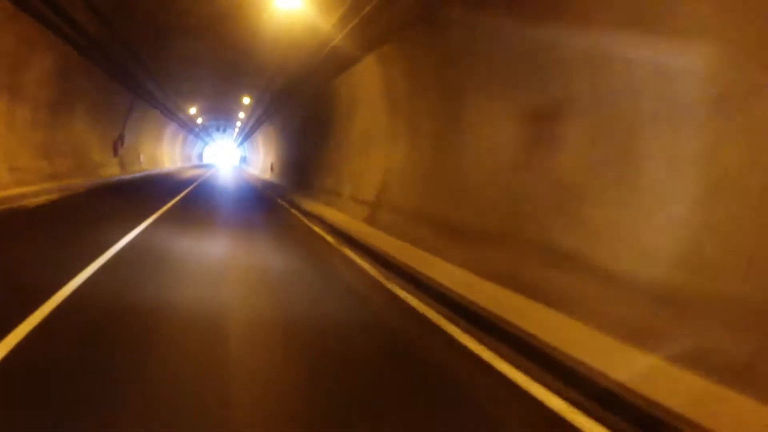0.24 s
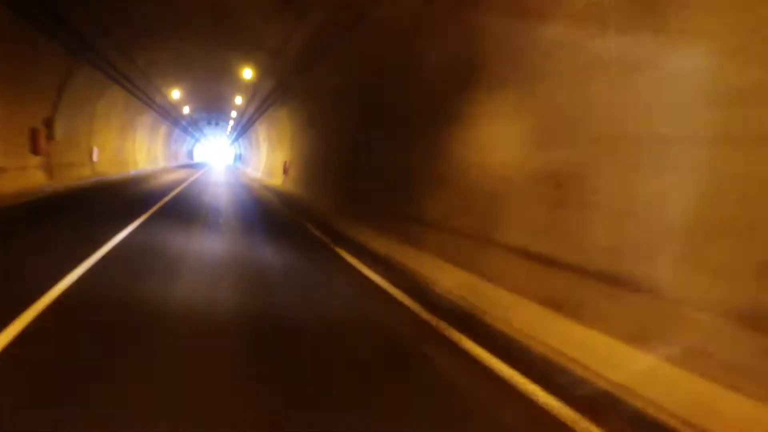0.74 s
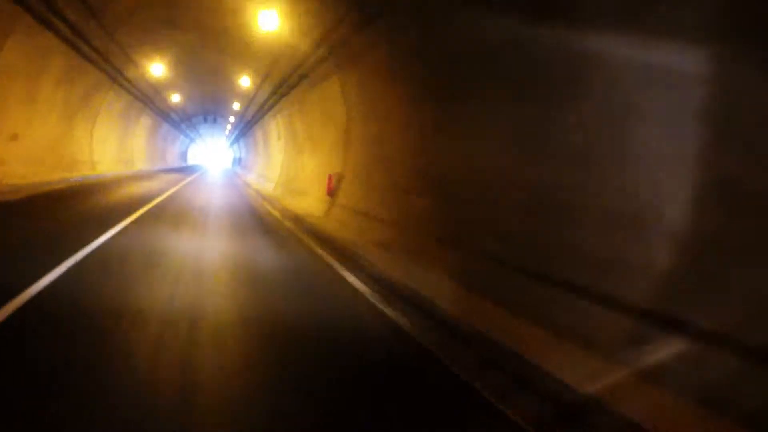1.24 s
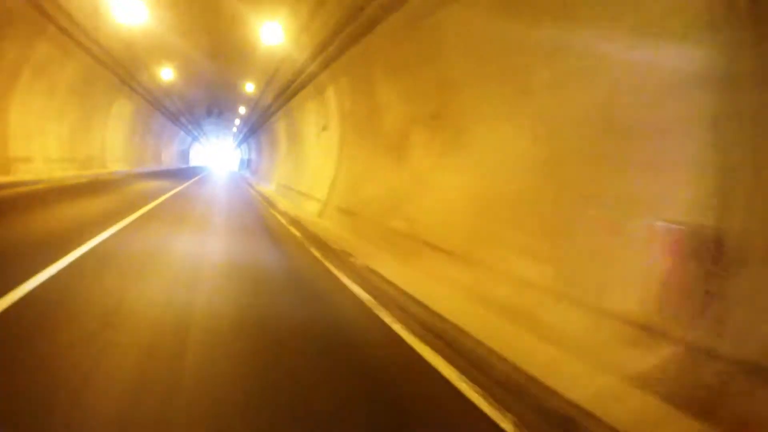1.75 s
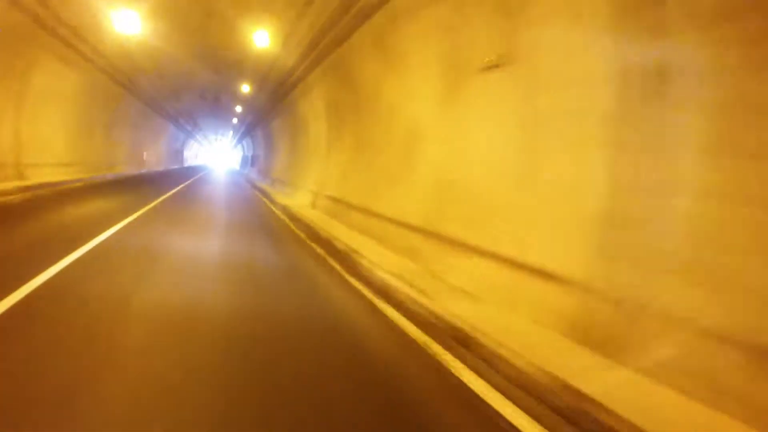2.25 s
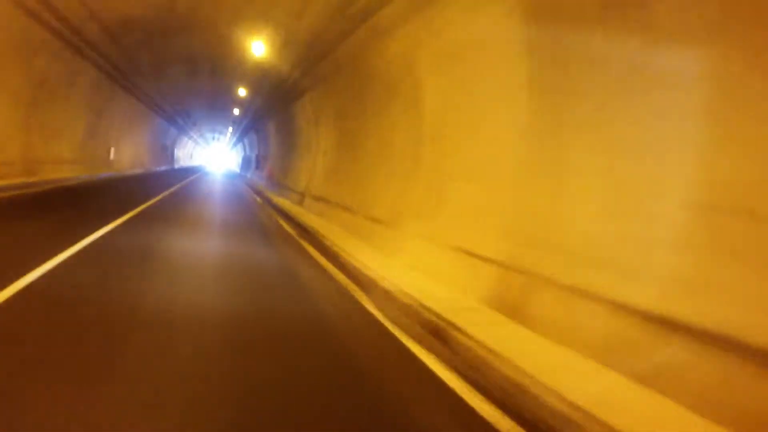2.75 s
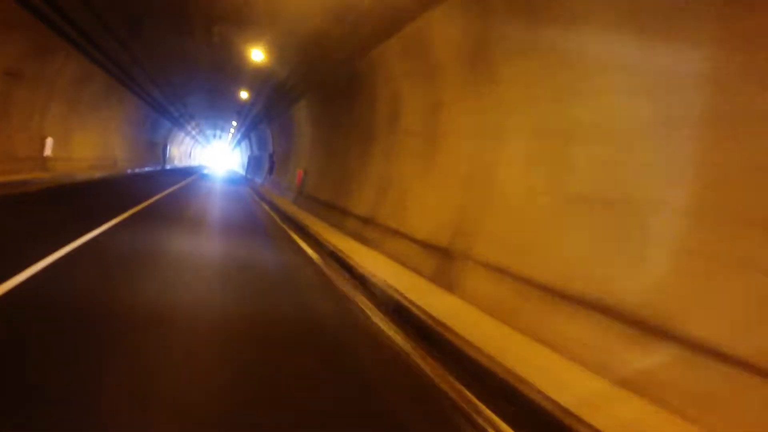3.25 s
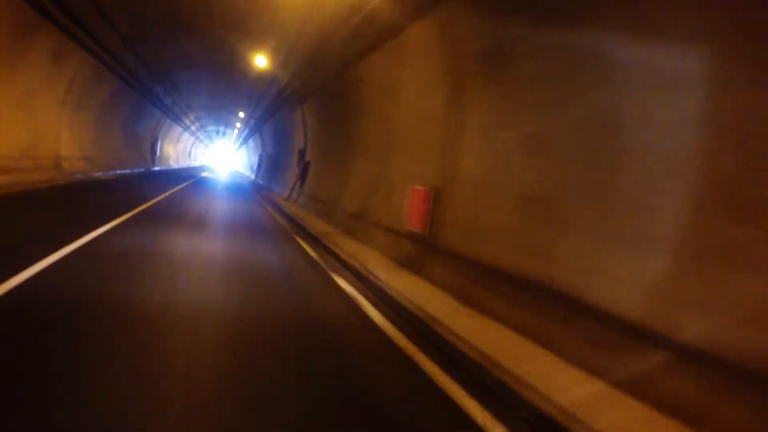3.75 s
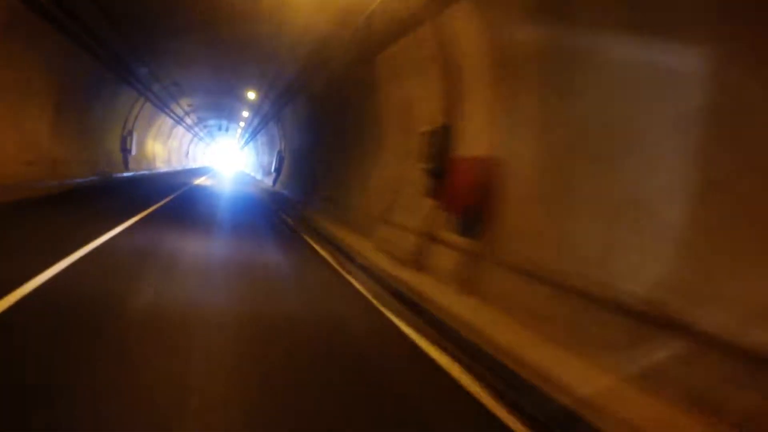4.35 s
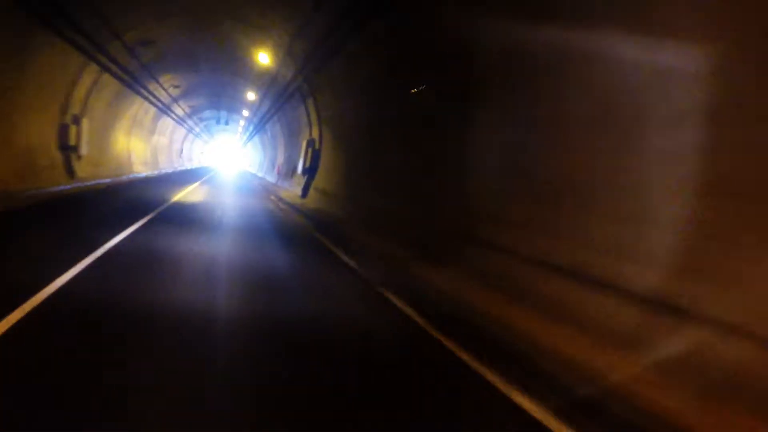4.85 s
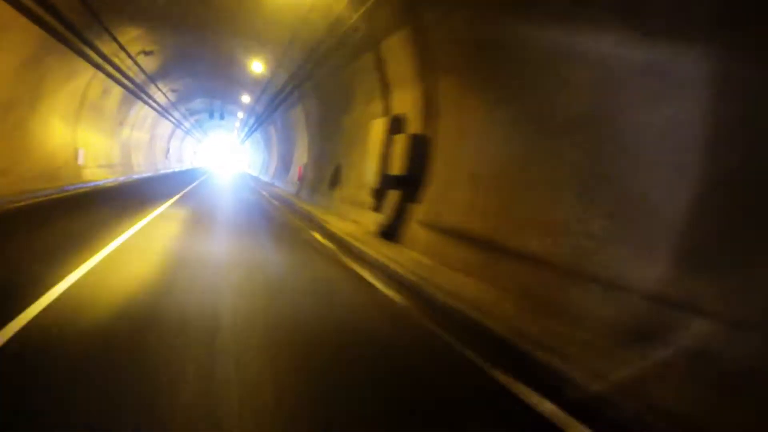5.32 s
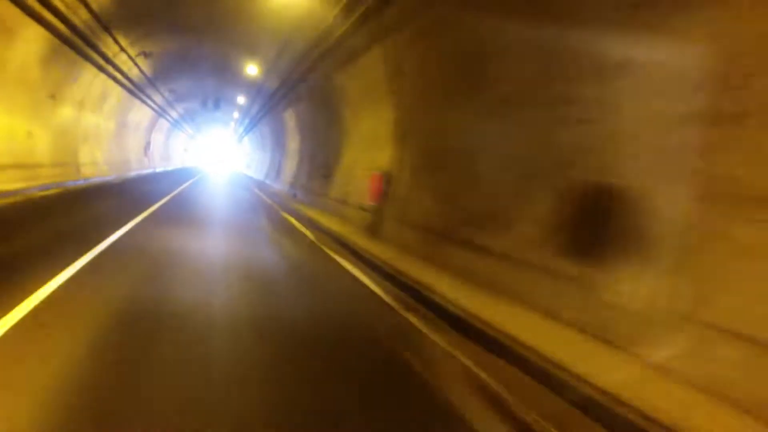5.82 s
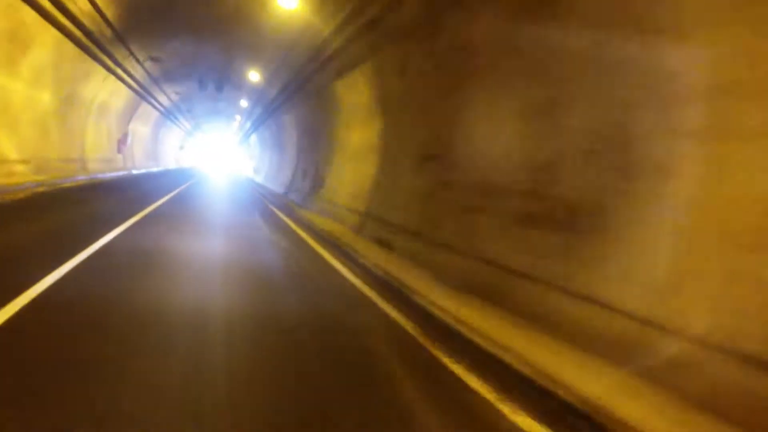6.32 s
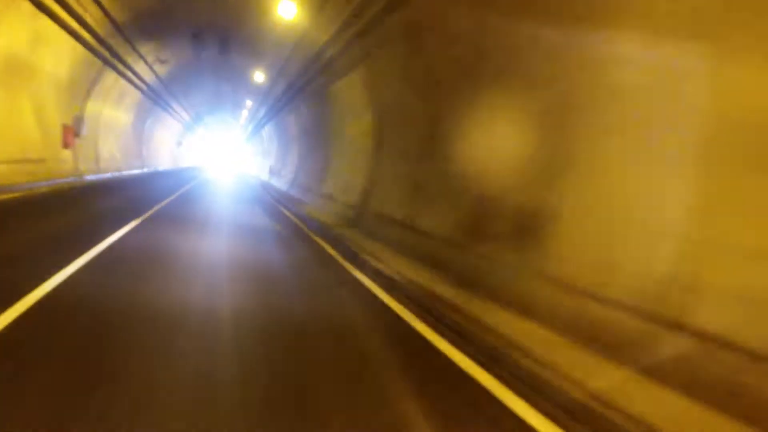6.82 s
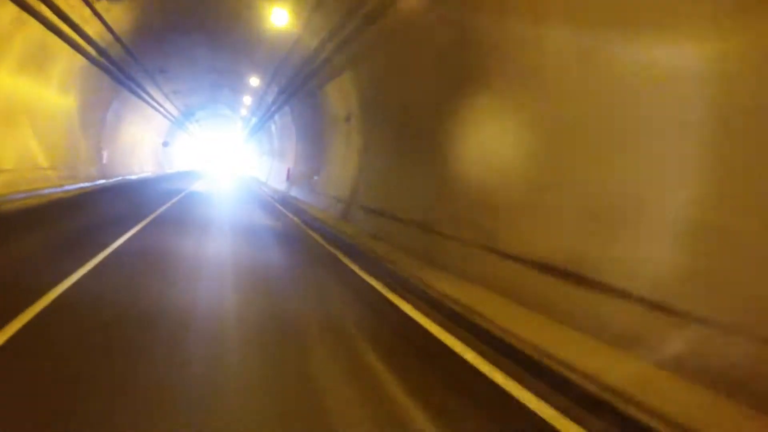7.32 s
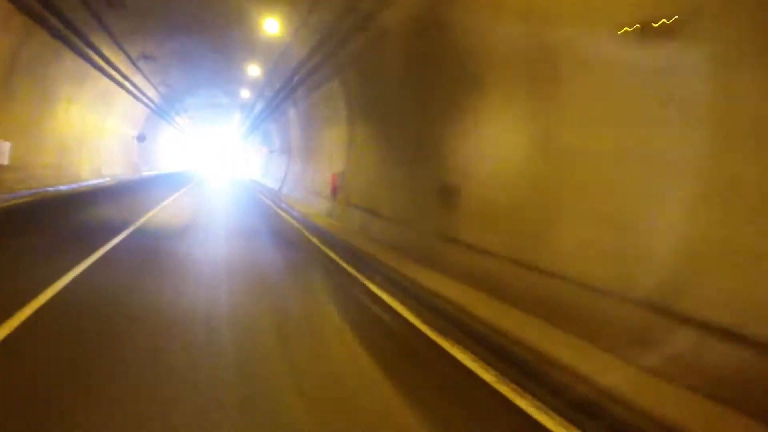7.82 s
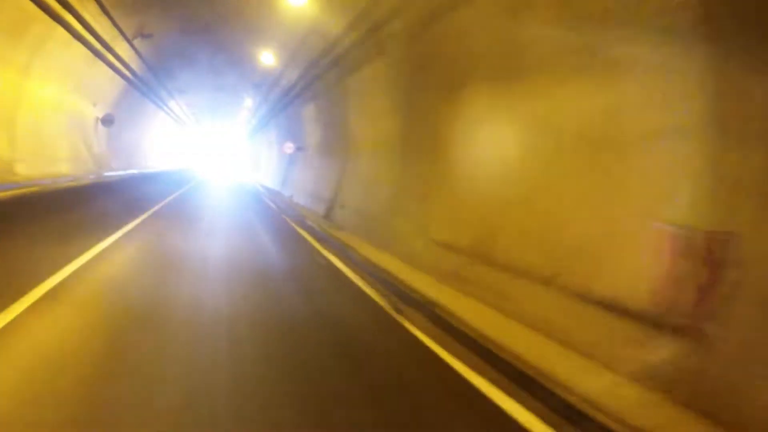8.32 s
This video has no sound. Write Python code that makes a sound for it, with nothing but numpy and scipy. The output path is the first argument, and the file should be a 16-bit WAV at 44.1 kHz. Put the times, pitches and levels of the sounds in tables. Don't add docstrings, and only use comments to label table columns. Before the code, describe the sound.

Steady low engine drone near 140 hertz with a rapid, uneven plastic rattle and dull road roar, heard from a bike-mounted camera in a tunnel.

```python
import sys
import numpy as np
from scipy import signal
from scipy.fft import rfft, irfft, next_fast_len
from scipy.io import wavfile
from scipy.ndimage import uniform_filter1d

SR = 44100
rng = np.random.default_rng(int(sys.argv[2]) if len(sys.argv) > 2 else 0)


def invert_db(x):
    u = np.asarray(x, float) / 20
    return 10 ** u


def unload_wav(signal):
    wavfile.write(
        sys.argv[1],
        SR,
        np.round(np.clip(np.atleast_2d(signal).T, -1, 1) * 32767).astype(np.int16),
    )


N = 377937
TIME = np.arange(N) / SR

# time in seconds, shake rate in Hz.
SHAKE_RATE = [(0.0, 139.7), (0.5, 139.867), (1.01, 139.937), (1.51, 139.876), (2.02, 139.813),
              (2.52, 140.033), (3.02, 140.426), (3.53, 141.018), (4.03, 141.343), (4.54, 141.714),
              (5.04, 141.81), (5.55, 142.167), (6.05, 142.505), (6.55, 142.613), (7.06, 142.814),
              (7.56, 143.151), (8.07, 142.963), (8.57, 143.394)]
# multiple of the shake rate, level in dB.
WEAK_LINES = [(0.499, -74), (0.752, -75.5), (1.252, -56.5), (1.502, -62.5), (1.75, -51), (2.248, -64.5),
              (2.75, -66), (3.001, -59.5), (3.23, -68), (3.998, -73.5), (5.502, -58.5)]
# start in seconds, end in seconds, lift in dB.
LOPSIDED = [
    (0, .24, 5.5),
    (1.95, 2.36, 5.5),
    (2.9, 3.03, 10),
    (3.03, 3.3, 11),
    (3.3, 3.47, 6.5),
    (3.47, 3.55, 11),
    (5.3, 5.52, 0),
    (6.2, 7.15, 4.5),
    (7.35, 8.6, 5),
]
# start in seconds, length in seconds, surge of the hum in dB.
SWINGS = [(0.214, 0.1, 3), (0.419, 0.057, 4), (0.512, 0.051, 1), (0.678, 0.29, 3), (0.985, 0.085, 1),
          (1.094, .095, 3.5), (1.428, 0.14, 2.5), (1.784, 0.028, 2), (1.944, 0.012, 1.5), (2.351, 0.025, 2),
          (2.501, 0.11, 2), (3.554, 0.013, 3.5), (3.604, 0.056, 2), (3.753, 0.089, 2.5),
          (3.863, 0.061, 1.5), (3.995, .36, 3), (4.603, 0.13, 3), (4.873, 0.12, 3.5), (5.039, 0.13, 1),
          (5.208, 0.25, 2.5), (5.691, 0.029, 4), (5.966, .12, 2), (6.198, 0.29, 1.5), (6.494, 0.093, 2),
          (6.726, 0.13, 3), (6.885, 0.387, 2), (7.402, 0.39, 4), (7.838, 0.29, 3), (8.134, 0.24, 1),
          (8.422, 0.14, 2)]
# time in seconds, change of the hum in dB.
JOLTS = [(.03, 0.5), (.379, -1.5), (.903, 0.6), (1.312, 0.2), (1.611, -2.5), (1.7, 0), (2.105, 2),
         (2.25, 0.5), (2.454, 0.5), (2.659, -1), (2.76, 1), (2.854, 1.5), (3.08, 0), (3.22, 0.5),
         (3.376, 0.5), (4.275, -1.5), (4.32, 2), (4.441, 2), (5.423, 2), (5.577, -1.5), (5.85, 0.5),
         (6.337, 1), (6.64, 3), (7.075, 0.2), (7.478, -3), (7.663, -2), (7.717, 0.8), (7.928, -2.5),
         (8.25, 1.6)]
# time in seconds, gain in dB, length in cycles.
MISSES = [(0.14, -2, 3), (0.194, -4, 2), (0.366, -2, 2), (0.394, -5, 2), (0.498, -3, 3), (0.666, -2, 2),
          (0.762, -4, 1), (0.938, -3, 2), (0.98, -3, 2), (1.073, -3, 2), (1.255, -5, 1), (1.366, -3, 2),
          (1.599, -5, 5), (2.006, -11, 1), (2.06, -3, 4), (2.146, -3, 2), (2.175, -7, 2), (2.267, -4, 2),
          (2.289, -5, 2), (2.457, -4, 3), (2.653, -3, 2), (2.685, -11, 1), (2.824, -7, 2), (2.967, -5, 2),
          (3.002, -21, 2), (3.034, -21, 1), (3.041, -4, 1), (3.07, -6, 1), (3.106, -3, 3), (3.141, -6, 3),
          (3.231, -11, 2), (3.308, -7, 2), (3.343, -3, 2), (3.443, -2, 2), (3.482, -6, 1), (3.51, -3, 1),
          (3.712, -3, 2), (3.737, -5, 1), (3.84, -2, 2), (3.875, -3, 2), (3.956, -3, 5), (4.377, -3, 2),
          (4.585, -4, 1), (4.949, -3, 2), (5.012, -3, 2), (5.188, -3, 2), (5.294, -3, 2), (5.484, -3, 2),
          (5.569, -4, 2), (5.593, -4, 1), (5.646, -3, 2), (5.765, -4, 2), (5.825, -4, 3), (5.966, -4, 1),
          (6.187, -5, 2), (6.691, -2, 2), (7.336, -3, 2), (7.367, -5, 1), (8.035, -3, 2), (8.426, -2, 2)]
# time in seconds, gain in dB, length in cycles.
SLAMS = [(0.072, 2, 2), (0.179, 3, 2), (0.416, 2, 2), (0.68, 2, 2), (0.795, 2, 2), (0.898, 3, 1),
         (1.47, 3, 1), (1.681, 3, 2), (1.752, 3, 2), (1.781, 3, 2), (1.82, 3, 1), (1.927, 3, 3),
         (2.028, 4, 3), (2.096, 2, 2), (2.128, 3, 1), (2.221, 3, 1), (2.242, 3, 3), (2.307, 3, 1),
         (2.474, 3, 2), (2.503, 3, 2), (2.603, 2, 2), (2.671, 3, 1), (2.781, 2, 2), (2.984, 3, 1),
         (3.016, 5, 2), (3.052, 4, 2), (3.183, 4, 1), (3.216, 4, 2), (3.251, 3, 2), (3.276, 3, 1),
         (3.326, 3, 1), (3.361, 3, 1), (3.386, 3, 2), (3.468, 3, 1), (3.5, 3, 2), (3.528, 4, 2),
         (3.556, 2, 2), (3.62, 3, 2), (3.698, 2, 2), (3.755, 3, 2), (3.889, 2, 2), (3.924, 3, 2),
         (3.999, 2, 3), (4.324, 3, 3), (4.434, 3, 2), (4.568, 3, 2), (4.994, 2, 1), (5.075, 2, 2),
         (5.135, 3, 1), (5.604, 2, 2), (5.783, 4, 1), (5.864, 2, 2), (5.945, 2, 3), (6.509, 2, 2),
         (6.674, 3, 1), (6.81, 2, 2), (6.979, 2, 2), (7.077, 3, 4), (7.709, 2, 1), (8.321, 2, 2)]
# start in seconds, end in seconds, gain in dB.
LOOSE = [(.6, 1.0, -0.5), (1.3, 1.4, -0.1), (2.15, 2.42, 2), (2.7, 2.9, 1.9), (3.0, 3.42, 2),
         (3.45, 3.56, -0.5), (3.6, 3.72, -0.3), (4.3, 4.5, -1.2), (4.7, 5.1, -0.1), (5.55, 5.8, 0.8),
         (5.88, 6.0, 2), (6.18, 6.3, 1), (6.35, 6.7, 0), (7.85, 7.97, 1.5), (8.35, 8.5, 1)]
# frequency in Hz, width in Hz, level in dB.
CASE_MODES = [(1880, 410, 2), (2530, 300, -2), (2895, 450, 2.5), (3324, 1060, -4)]
# frequency in Hz, width in Hz, level in dB.
SHELL_MODES = [(1240, 52, -12), (1471, 248, 5), (1593, 17, 6), (2010, 260, -11.5)]
# frequency in Hz, width in Hz, level in dB.
FREE_MODES = [(1182, 390, 9), (1665, 300, 10), (2354, 400, 13.5)]
# frequency in Hz, width in Hz, level in dB.
THUMP_MODES = [(451, 150, -14), (775, 360, 3.5), (810, 184, 9), (1025, 173, 2.5)]
# frequency in Hz, width in Hz, level in dB.
TICK_MODES = [(4496, 490, 11.5), (5020, 1030, 3.5), (5974, 550, 2), (6544, 880, 6), (7670, 120, -1),
              (8200, 600, -5.5), (9140, 940, -7.5), (10080, 420, -12), (10800, 1200, -16.5),
              (12000, 1200, -25), (13300, 1400, -35), (14200, 730, -30)]
# time of the widest swing in seconds, peak in dB, half length in seconds, sway rate in Hz.
ROAD_JOINTS = [(0.01, -72, 0.076, 31.2), (0.212, -59, 0.029, 28.5), (0.385, -53, 0.21, 31.6),
               (0.791, -59.2, 0.25, 32), (0.96, -68, 0.11, 27.3), (1.103, -65.5, 0.41, 28.1),
               (1.299, -58, 0.27, 30.1), (1.396, -53, 0.063, 30.8), (1.43, -51, 0.092, 33.3),
               (1.728, -47, 0.17, 26.3), (1.83, -45, 0.17, 29.1), (2.085, -65, 0.048, 32),
               (2.389, -46, 0.17, 30.3), (2.473, -52, 0.057, 31.5), (2.682, -54.5, 0.037, 33),
               (2.8, -46, 0.054, 29.8), (2.972, -64, 0.17, 32.2), (3.092, -47, 0.22, 29.9),
               (3.148, -45, 0.32, 26.7), (3.212, -58, 0.033, 33.2), (3.318, -54.5, 0.25, 32.3),
               (3.601, -59, 0.098, 33.6), (3.871, -57, 0.04, 30), (3.938, -51, 0.2, 28.2),
               (4.432, -52, 0.17, 29.3), (4.796, -58.3, 0.093, 28.2), (5.02, -42, 0.18, 31.4),
               (5.586, -58.5, 0.12, 30.8), (5.692, -67, 0.11, 27.1), (5.703, -60, 0.18, 33.5),
               (5.962, -48, 0.099, 27), (6.021, -52, 0.34, 32), (6.298, -65, 0.1, 30),
               (6.658, -52, 0.18, 27.9), (6.912, -44, 0.058, 33), (7.065, -58, 0.057, 31.3),
               (7.902, -59.0, 0.11, 30.2), (8.229, -48, 0.21, 28.8), (8.368, -53, 0.037, 31.5),
               (8.552, -54, 0.04, 31.5)]
# time in seconds, peak in dB.
THIN_CLICKS = [(0.6255, -63), (1.927, -62), (2.1271, -59), (2.4274, -65), (2.6274, -70), (3.1278, -68),
               (3.2475, -70), (3.5952, -70), (4.2956, -78), (4.4293, -69), (4.7965, -69), (5.5009, -81),
               (5.9309, -71), (6.632, -59), (7.6326, -58), (7.9329, -70)]
# frequency in Hz, density in dB per Hz.
ROAD_COLOUR = [(30, -14), (110, -15), (200, -13.5), (290, 4.5), (345, -15.5), (520, -16), (750, -13.5),
               (1500, -2.5), (16000, -62)]

HUM_DB, OCTAVE_DB, KNOCK_DB, ROAD_DB, ROAD_SWELL_DB = -28, -52, -37, -47, 1.2
BUILD_S, CREST_S, DRAINED_DB, SETTLE_S, EDGE_S = 0.032, 0.016, 0.97, 0.014, 0.023
JOLT_S = 0.03
SHELL_GAIN_DB, BACK_GAIN_DB, KNOCK_LOSS_DB = 5.5, 3, 0.34
SHELL_LAG_S, JUDDER_LAG_S, BACK_LAG_S, REBOUND_LAG_S = 0.0003, 0.0018, 0.0038, 0.0009
GAP_LAG_S, BEND_LAG_S = 0.0073, 0.01
UNSTEADY_DB, GRIT_DB = 0.7, 4
CASE_TOP_HZ = 3830
PATCH_DB, PATCH_FROM_HZ = 7, 7500
SWAY_HZ, SWAY_WIDTH_HZ = 29.4, 2


def level(x, db):
    return x * invert_db(db) / np.sqrt(np.mean(x ** 2))


def wander(hz):
    slow = signal.butter(2, hz, fs=SR, output="sos")
    return level(signal.sosfilt(slow, rng.standard_normal(N)), 0)


def spans(rows):
    gates = sum(height * ((TIME > start) & (TIME < end)) for start, end, height in rows)
    return uniform_filter1d(gates, size=max(int(EDGE_S * SR), 1))


def ring(x, hz, width_hz):
    b, a = signal.iirpeak(hz, hz / width_hz, fs=SR)
    return signal.lfilter(b, a, signal.lfilter(b, a, x))


def body(x, modes):
    return level(sum((-1) ** k * invert_db(db) * ring(x, hz, w) for k, (hz, w, db) in enumerate(modes)), 0)


def clicks(s, size):
    at = np.clip(s * SR, 8, N - 9)
    near = at.astype(int)[:, None] + np.arange(-7, 9)
    off = near - at[:, None]
    shape = np.sinc(off) * np.cos(np.pi * off / 16) ** 2
    return np.bincount(near.ravel(), (size[:, None] * shape).ravel(), N)


def late(x, lag_s):
    return np.interp(np.arange(N) - lag_s * SR, np.arange(N), x)


def engine(turns, swing, surge_db):
    hum_db = HUM_DB + surge_db + 0.56 * wander(23)
    octave_db = OCTAVE_DB + 0.5 * surge_db + spans(LOPSIDED) + 1.2 * wander(14.0)
    phase = 2 * np.pi * turns
    bend = 0.063 * signal.hilbert(swing, next_fast_len(N))[:N].imag
    hum = invert_db(hum_db) * (1 + 0.041 * swing) * np.cos(phase + bend + 0.098 * wander(6.8))
    octave = invert_db(octave_db) * np.cos(2 * phase + 6 * bend + 1.9 + 0.39 * wander(8.7))
    weak = sum(invert_db(db + 3.2 * wander(13)) * np.cos(order * phase + 1.1 * wander(4.6))
               for order, db in WEAK_LINES)
    return np.sqrt(2) * (hum + octave + weak)


def surge():
    db = np.zeros(N)
    for start, length, crest_db in SWINGS:
        crest, end = start + CREST_S, start + max(length, 2 * CREST_S)
        left_db = crest_db - (crest_db - DRAINED_DB) * min(length / 0.059, 1)
        held = np.interp(TIME, [crest, end], [crest_db, left_db])
        build = np.maximum(crest - TIME, 0) / BUILD_S
        settle = np.maximum(TIME - end, 0) / SETTLE_S
        db = np.maximum(db, held * np.exp(-build - settle))
    bumps = sum(size_db * np.exp(-((TIME - at) / JOLT_S) ** 2) for at, size_db in JOLTS)
    return uniform_filter1d(db, size=SR // 40) + bumps


def rattle(turns, sway, surge_db):
    far = spans([(start, start + length, 1) for start, length, _ in SWINGS])
    loose = spans(LOOSE)
    knock_db = KNOCK_DB + loose + 0.88 * surge_db - KNOCK_LOSS_DB * far + 1.05 * wander(25.0)
    low_db = SHELL_GAIN_DB * far + 1.1 * surge_db + UNSTEADY_DB * wander(5.9)
    back_db = BACK_GAIN_DB * far + 0.87 * surge_db + 1.16 * wander(24)
    cycle = np.arange(1, int(turns[-1]))
    s = np.interp(cycle, turns, TIME) - 0.00006
    i = np.minimum(s * SR, N - 1).astype(int)
    chance = rng.standard_normal((13, len(s)))
    reached = far[i]
    four_knock = 0.93 * np.cos(np.pi * cycle / 2 + 0.65)
    gap = 0.69 * sway[i] + four_knock + 1.45 * (1 - 0.26 * reached) * chance[0]
    db = knock_db[i] - 0.12 * gap
    for at, gain_db, cycles in [*MISSES, *SLAMS]:
        change_db = 1.11 * min(gain_db, 0) + 0.92 * max(gain_db, 0)
        db = db + change_db * (abs(s - at) < cycles / 2 / SHAKE_RATE[0][1])
    size = invert_db(db)
    scale = np.sqrt(np.mean(size ** 2))
    s = s + 0.00003 * gap + 0.00006 * wander(27.2)[i] + 0.000015 * chance[1]
    swing = invert_db(back_db[i] - np.mean(back_db))

    knock = clicks(s, size)
    chatter = clicks(s + 0.00031 + 0.00002 * chance[2], size * (0.31 + 0.1 * chance[3]))
    late_size = size * swing ** 0.2 * (0.15 + 0.033 * chance[5])
    late_knock = clicks(s + 0.001646 + 0.000088 * chance[4], late_size)
    echo_size = size * swing ** 1.4 * (0.064 + 0.028 * chance[4])
    echo = clicks(s + 0.001938 + 0.00012 * chance[8], echo_size)
    back_size = size * swing ** 1.47 * invert_db(0.27 * chance[7] - 2.8 * (1.5 - reached))
    back = clicks(s + BACK_LAG_S + 0.00009 * chance[6], back_size)
    case = body(knock + chatter + late_knock + echo + 0.097 * back, CASE_MODES) * invert_db(3.0)

    heave_db = low_db[i] - np.mean(low_db)
    low = shell(s, i, size, scale, reached, heave_db, chance) + thump(s, i, size, scale, reached, sway)
    dull = signal.sosfilt(signal.butter(4, CASE_TOP_HZ, fs=SR, output="sos"), case + low)
    hard = size * (size / scale) ** 0.039 * swing ** 0.49 * invert_db(0.2 * chance[10] - 0.62 * loose[i])
    bright = tick(turns, s, i, hard, swing, far, late_knock, back, chance)
    return scale * (dull + level(bright, -16.0))


def shell(s, i, size, scale, reached, heave_db, chance):
    heave = size * invert_db(1.11 * heave_db - 0.42 * reached * chance[8])
    heave_s = s + SHELL_LAG_S + (0.00009 - 0.00007 * reached) * chance[9]
    heaving = body(clicks(heave_s, heave), SHELL_MODES) * invert_db(-5.5)
    judder_size = size * reached * invert_db(GRIT_DB * wander(24)[i])
    judder = clicks(s + JUDDER_LAG_S + 0.00044 * chance[11], judder_size)
    juddering = level(ring(ring(judder, 2140, 630), 1940, 1400), -9.5)
    free_size = size * (scale / size) ** 0.19 * (1 - reached)
    free = clicks(s + 0.00168 + 0.000083 * chance[11], free_size)
    return heaving + juddering + body(free, FREE_MODES) * invert_db(-10.5)


def thump(s, i, size, scale, reached, sway):
    uneven = 0.00009 * (1 - 0.34 * reached) * wander(33)[i]
    shove = s - 0.0018 + 0.00009 * np.tanh(sway[i]) + uneven
    earlier_sway = np.tanh(sway[np.maximum(i - SR // 120, 0)])
    push_db = 4.3 * reached + 0.8 * earlier_sway + 2.35 * wander(12.3)[i]
    push = size ** 0.77 * scale ** 0.65 * invert_db(push_db)
    shoves = clicks(shove, push) + clicks(shove + 0.00189, 0.34 * push)
    shoves = shoves + clicks(shove + 0.003332, (0.57 + 0.28 * reached) * push)
    return body(shoves, THUMP_MODES) * invert_db(-12.5)


def tick(turns, s, i, hard, swing, far, late_knock, back, chance):
    contact = clicks(s, hard) + 0.1 * late_knock + 0.35 * back
    glint_db = GRIT_DB * (wander(30)[i] + 0.76 * chance[12])
    glint = clicks(s, hard * swing ** 0.5 * invert_db(glint_db))
    rebound_s = s + REBOUND_LAG_S + 0.00021 * chance[9]
    rebound = clicks(rebound_s, 1.53 * hard / swing ** 0.27) + 0.53 * back
    rubbing = abs(contact + clicks(s + REBOUND_LAG_S, 0.11 * hard * swing * far[i]))
    rub_decay = np.exp(-1 / (0.004 * SR))
    scrape = signal.lfilter([1], [1, -rub_decay], rubbing) * rng.standard_normal(N)
    blow = (turns + 0.15).astype(int)
    out = np.zeros(N)
    for k, (hz, width_hz, db) in enumerate(TICK_MODES):
        if hz > PATCH_FROM_HZ:
            found = PATCH_DB * (1 - 1.1 * far) * rng.standard_normal(blow[-1] + 1)[blow]
            patch_db = uniform_filter1d(np.minimum(found, 4), size=32) + 2.3 * far
        else:
            patch_db = 3.2 * far * (4600 < hz < 6000)
        if hz < 7000:
            after = (0.75 if hz > 4600 else 0.3) * rebound
            sign = (-1) ** (k // 2)
        else:
            after = (0.33 * glint + 0.25 * back) * (hz / 9000) ** 2
            sign = (-1) ** k
        drive = scrape * 0.024 + contact * (hz / 9000) + after
        out += sign * invert_db(db + patch_db) * ring(drive, hz, width_hz)
    return out


def mount():
    t = np.arange(0, N, 16) / SR
    swings = np.zeros(len(t))
    for at, db, half_s, hz in ROAD_JOINTS:
        swings += invert_db(db) * np.exp(-((t - at) / half_s) ** 2) * np.cos(2 * np.pi * hz * (t - at))
    faint = level(ring(rng.standard_normal(N), SWAY_HZ, SWAY_WIDTH_HZ), -67.5)
    return np.interp(TIME, t, swings) + faint


def thin_clicks():
    s, db = np.transpose(THIN_CLICKS)
    bright = signal.butter(1, [7000, 15000], "band", fs=SR, output="sos")
    return signal.sosfilt(bright, clicks(s, invert_db(db + 30.5)))


def road():
    hz = np.fft.rfftfreq(N, 1 / SR) + 1
    f, db = np.transpose(ROAD_COLOUR)
    colour = invert_db(np.interp(np.log(hz), np.log(f), db))
    roar = irfft(rfft(rng.standard_normal(N)) * colour, N)
    return level(roar, ROAD_DB) * invert_db(ROAD_SWELL_DB * wander(23.0))


def scene():
    s, rate_hz = np.transpose(SHAKE_RATE)
    turns = 0.45 + np.cumsum(np.interp(TIME, s, rate_hz)) / SR
    sway = mount()
    reach = level(sway, 0)
    swing = reach / np.sqrt(uniform_filter1d(reach ** 2, size=SR // 10) + 0.24)
    surge_db = surge()
    hum = engine(turns, late(swing, BEND_LAG_S), surge_db)
    knocks = rattle(turns, late(reach, GAP_LAG_S), surge_db)
    return (hum + knocks + sway + thin_clicks() + road())[None]


def top_cut(x):
    return signal.sosfilt(signal.butter(12, 15850, fs=SR, output="sos"), x)


def record(dry):
    return top_cut(dry)


dry = scene()
out = record(dry)
unload_wav(out)
```